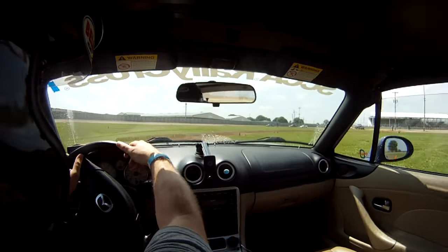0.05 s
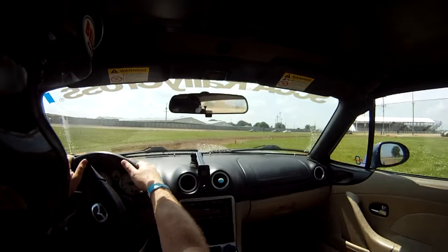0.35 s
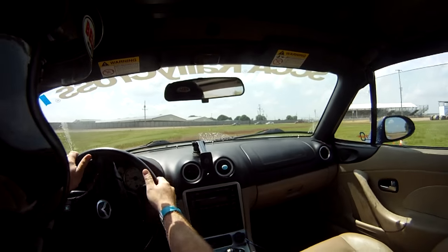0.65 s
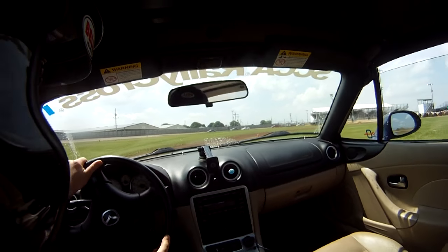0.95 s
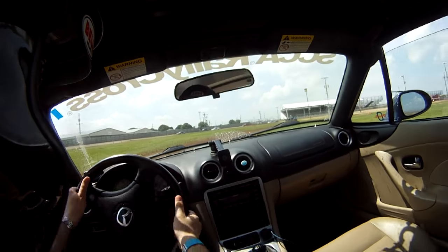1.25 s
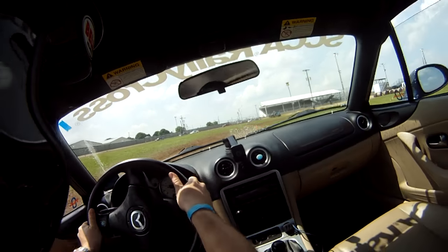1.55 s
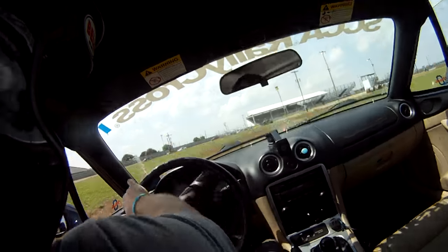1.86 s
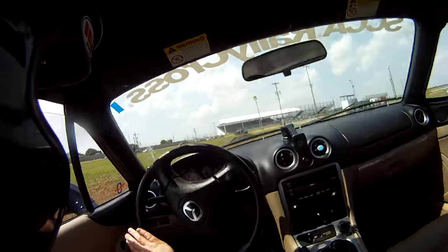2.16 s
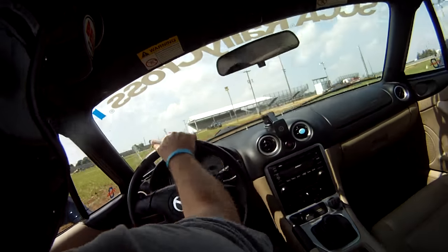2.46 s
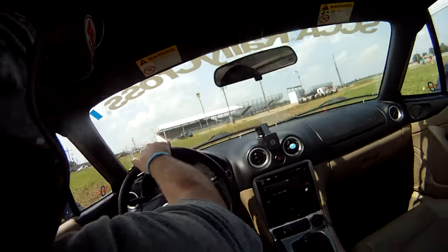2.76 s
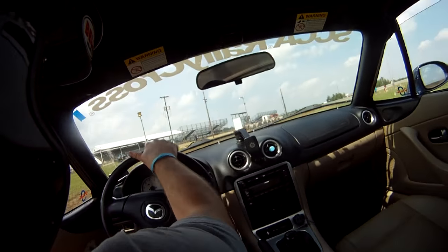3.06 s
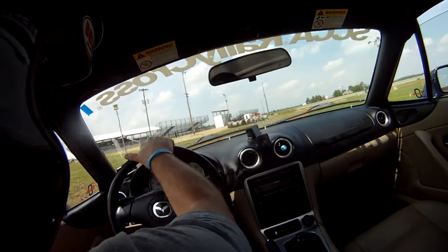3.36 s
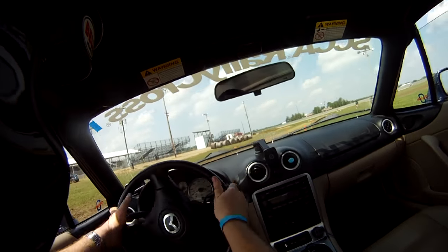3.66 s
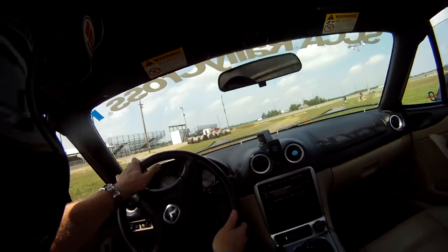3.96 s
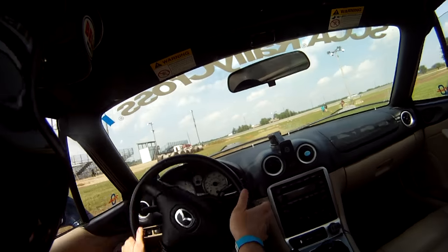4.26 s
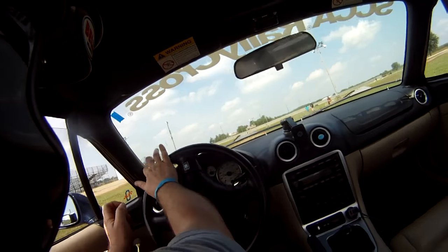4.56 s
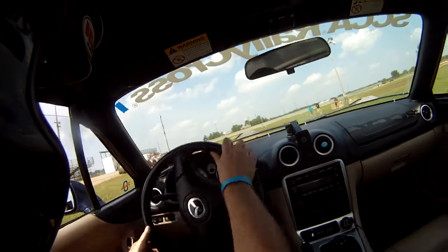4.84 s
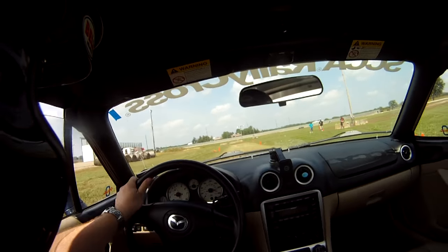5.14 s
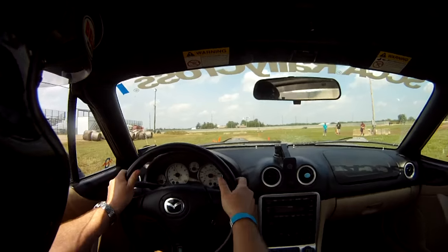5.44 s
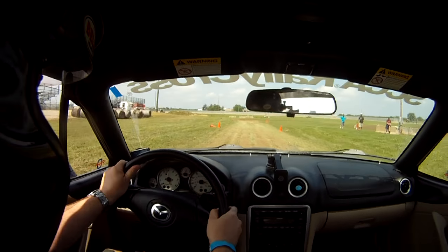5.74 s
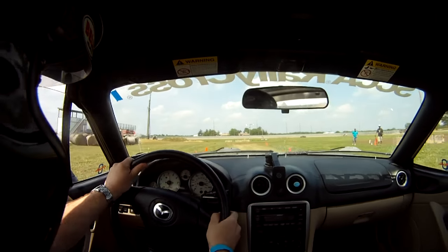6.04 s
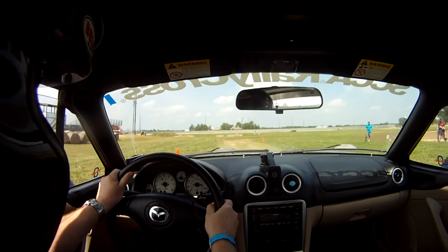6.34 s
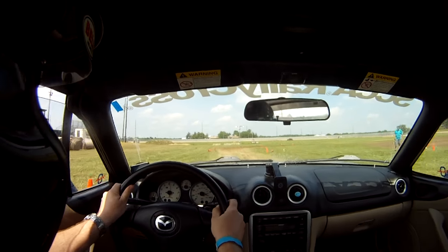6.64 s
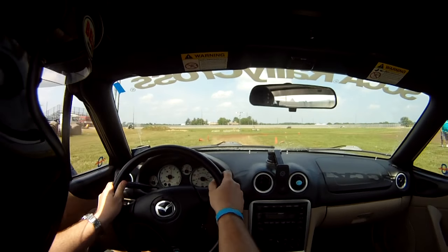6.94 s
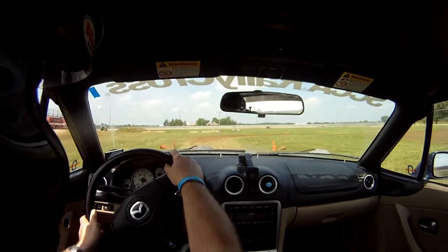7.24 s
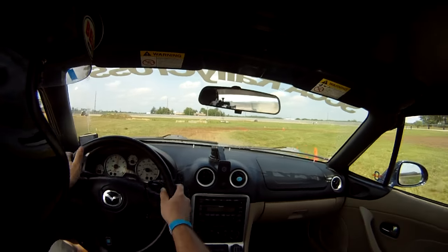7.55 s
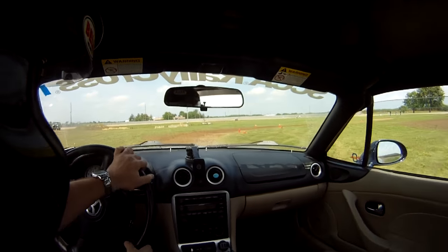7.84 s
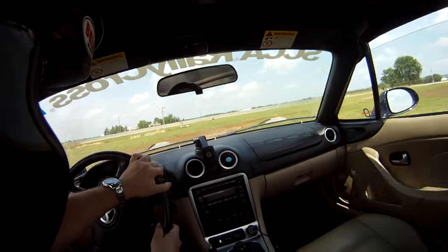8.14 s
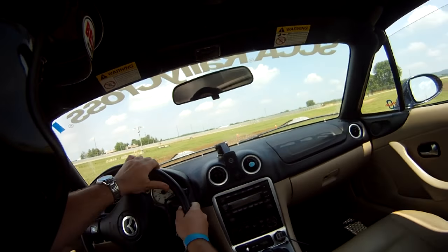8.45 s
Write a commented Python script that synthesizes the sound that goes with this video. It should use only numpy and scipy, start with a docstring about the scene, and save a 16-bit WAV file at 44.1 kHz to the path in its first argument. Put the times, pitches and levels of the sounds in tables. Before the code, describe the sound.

Inside a car bumping over dirt, with low rumble, a faint engine, gritty plastic rattling and several sharp clacks and heavy thumps.

```python
"""Rough ride in a small car

A car is driven hard over dirt and grass, heard from inside a closed plastic housing on a mount.
Bumpy ground shakes the cabin, the engine pulls faintly, and grit and loose trim rattle the housing.
In the ruts the mount clacks against its stop and the suspension bottoms out with heavy thumps."""
import sys
import numpy as np
from scipy import signal
from scipy.fft import rfft, irfft, next_fast_len
from scipy.io import wavfile

SR = 44100
rng = np.random.default_rng(int(sys.argv[2]) if len(sys.argv) > 2 else 0)


def to_wav(s):
    """Save 16-bit WAV."""
    ch = np.atleast_2d(s).T  # columns
    pcm = np.round(np.clip(ch, -1, 1) * 32767)  # PCM
    wavfile.write(sys.argv[1], SR, pcm.astype(np.int16))


N = 374850
TIME = np.arange(N) / SR

# the engine pulls, sags in a long turn and pulls again: (time [s], firing rate [Hz], level [dB])
ENGINE_CURVE = [(0, 114, -51.5), (.75, 129.2, -47.5), (1.5, 148, -56), (2.2, 135, -52), (3, 112, -64),
                (3.6, 124, -67.5), (5.5, 113, -48.5), (6, 118, -54.5), (6.45, 133, -45.5), (7, 141, -43.5),
                (7.5, 153, -51), (7.9, 159, -49.5), (8.5, 152, -68)]
# pitches at which the plastic housing rings: (pitch [Hz], width [Hz], level [dB])
HOUSING_RINGS = [(850, 970, -10), (1230, 38.4, 4), (1435, 93, 0.5), (1504, 523, -0.5), (2143, 115, 5),
                 (2434, 170, -1), (2860, 115, -1.5), (3490, 237, -7.5), (3897, 224, -8),
                 (4860, 1200, -20.5), (8100, 67, -39.5), (8440, 1700, -17.5), (9410, 85, -8.5),
                 (9800, 290, -12), (10990, 67, -20.5), (13800, 270, -12), (13900, 130, -32),
                 (14360, 210, -18.5)]
# tone colour of a crash and of a tick: (frequency [Hz], level [dB])
CRASH_COLOUR = [(150, 8.5), (350, 2.5), (520, -4.5), (850, 9), (1400, 5), (2200, 8), (3000, -6),
                (3800, -6.5), (6000, -25), (8300, -14.5), (10000, -5.5), (12000, -21), (14300, -9.5),
                (16000, -12.5)]
TICK_COLOUR = [(500, -5.5), (1800, -6), (3400, -2.5), (6000, -22), (8600, -10), (12000, -34), (15000, -11)]


def from_db(db):
    """Turn decibels into a volume factor."""
    return 10 ** (np.asarray(db) / 20)


def rms_one(x):
    """Scale a signal to an average power of 1."""
    return x / np.sqrt(np.mean(x ** 2) + 1e-20)


def in_time(rows):
    """Join timed rows with straight lines, giving one curve per value column."""
    times, *columns = np.transpose(rows)
    return [np.interp(TIME, times, column) for column in columns]


def drift(rate_hz, size=4096):
    """A smooth random wobble of about 1 either way, mostly slower than rate_hz."""
    hz = np.arange(size // 2 + 1) * SR / N
    spectrum = rfft(rng.standard_normal(size)) / (1 + (hz / rate_hz) ** 2)
    return np.interp(TIME, np.linspace(0, TIME[-1], size), rms_one(irfft(spectrum, size)))


def colour(x, points):
    """Filter a sound to follow points of (frequency [Hz], level [dB])."""
    size = 2 * next_fast_len(len(x))
    hz = np.maximum(np.arange(size // 2 + 1) * SR / size, 1)
    point_hz, db = np.transpose(points)
    gain = from_db(np.interp(np.log(hz), np.log(point_hz), db))
    # minimum phase: nothing rings before the hit that causes it
    cepstrum = irfft(np.log(gain))
    cepstrum[1:size // 2] *= 2
    cepstrum[size // 2 + 1:] = 0
    return irfft(rfft(x, size) * np.exp(rfft(cepstrum)))[:len(x)]


def resonate(x, rings):
    """Let a sound ring at several pitches, added with alternating signs."""
    out = 0
    for k, (hz, width, db) in enumerate(rings):
        r = np.exp(-np.pi * width / SR)
        poles = [1, -2 * r * np.cos(2 * np.pi * hz / SR), r * r]
        ring = (1 - r * r) / 2 * signal.lfilter([1, 0, -1], poles, x + 1e-18)
        out += (-1) ** k * from_db(db) * ring
    return out


def rising(seconds):
    """A soft start that climbs from 0 towards 1."""
    return 1 - np.exp(-TIME[:SR // 3] / seconds)


def dying(t60):
    """A fade that falls 60 dB in t60 seconds, cut to a third of a second."""
    return np.exp(-np.log(1000) * TIME[:SR // 3] / t60)


def tone(hz, t60):
    """One pure note, struck and left to fade."""
    return np.sin(2 * np.pi * hz * TIME[:SR // 3]) * dying(t60)


def burst(shape, points):
    """A puff of noise with the given loudness shape and tone colour."""
    return colour(shape * rng.standard_normal(len(shape)), points)


def add(track, time_s, sound, peak_db):
    """Lay a sound into the track at its time and peak level."""
    start = int(time_s * SR)
    part = sound[:N - start]
    track[start:start + len(part)] += from_db(peak_db) * part / np.abs(part).max()


def contacts(per_s, spread_db, size=N):
    """Tiny hits at random moments; spread_db makes their strength uneven."""
    strength = from_db(spread_db * np.minimum(rng.exponential(1, size), 4))
    return (rng.random(size) < per_s / SR) * strength * rng.choice([-1, 1], size)


def roughness(usual_db=-47):
    """How much rougher than usual the ground is, in dB."""
    # the ground under the tyres: (time [s], roughness [dB])
    ground = [(0.0, -50), (0.5, -49.5), (1.16, -45.5), (1.32, -42), (1.82, -38), (2.29, -40.5), (2.72, -38),
              (3.43, -46.5), (4.26, -46), (4.71, -47), (6.44, -50.5), (6.84, -48.5), (7.29, -48.5),
              (7.84, -43), (8.05, -44), (8.5, -45.5)]
    return in_time(ground)[0] - usual_db


def heave():
    """Each hump lifts the body on its springs: a swell of extra shake, in dB."""
    # humps in the ground: (time [s], half length [s], extra shake [dB])
    humps = [(1.233, 0.14, 12.5), (2.221, .1, 6), (3.16, .18, 5), (4.155, .17, 7.5), (6.961, .07, 5),
             (7.776, .1, 2.5), (8.5, 0.24, 5)]
    return sum(db * np.exp(-((TIME - time_s) / half_s) ** 2) for time_s, half_s, db in humps)


def spray_level(usual_db=-49.5, ease_s=0.04):
    """The level of flying dirt in dB: higher on rough ground, over humps and in slides."""
    # hard turns where sliding tyres throw dirt: (start [s], end [s], extra spray [dB])
    slides = [(1.578, 3.264, 2), (3.644, 4.66, 2.5), (7.552, 8.367, 4)]
    sliding_db = sum(db * np.clip(np.minimum(TIME - start, end - TIME) / ease_s, 0, 1)
                     for start, end, db in slides)
    return usual_db + 0.7 * roughness() + 0.25 * heave() + sliding_db


def whine(panel_hz=563, panel_width_hz=62, waver=0.00484, flutter_db=3.5):
    """Parts turning with the engine sing faintly as they pass the pitch at which a panel rings."""
    # whining parts: (multiple of the firing rate, level relative to the engine [dB])
    parts = [(3.75, -6.5), (4, -17), (4.5, -9.5)]
    firing_hz, level_db = in_time(ENGINE_CURVE)
    cycles = np.cumsum(firing_hz * (1 + waver * drift(6.25))) / SR
    out = 0
    for multiple, db in parts:
        response = 1 / (1 + (2 * (multiple * firing_hz - panel_hz) / panel_width_hz) ** 2)
        out += from_db(db) * response * np.sin(2 * np.pi * multiple * cycles)
    return from_db(level_db + flutter_db * drift(4.4)) * out


def engine(waver=0.0043):
    """The firing engine hums; each of its tones swells near a pitch at which the cabin rings."""
    # engine tones: (multiple of the firing rate, level [dB])
    engine_tones = [(1, 2), (2, -15), (2.5, -40), (3, -19.5), (4, -28), (5, -23)]
    # pitches at which the cabin rings: (pitch [Hz], width [Hz], boost [dB])
    cabin_rings = [(229.9, 9.6, 12.5), (673, 27, 11)]
    firing_hz, level_db = in_time(ENGINE_CURVE)
    cycles = np.cumsum(firing_hz * (1 + waver * drift(25))) / SR
    out = 0
    for multiple, db in engine_tones:
        lift_db = sum(boost / (1 + (2 * (multiple * firing_hz - hz) / width) ** 2)
                      for hz, width, boost in cabin_rings)
        out += from_db(db + lift_db) * np.sin(2 * np.pi * (multiple * cycles + rng.random()))
    return from_db(level_db) * out


def road(usual_shake_db=-37.5, usual_roar_db=-43.5):
    """Rough ground shakes the body on its springs, and the tyres roar through the floor."""
    # tone colour of the deep shake and of the tyre roar: (frequency [Hz], level [dB])
    shake_colour = [(10, -28.5), (22, -5.5), (34, 3.5), (44, -3.5), (60, -11), (80, -13.5), (160, -62)]
    roar_colour = [(55, -31.5), (78, -5.5), (102, 5.5), (130, -9), (190, -13.5), (240, -10.5), (330, -14),
                   (480, -22), (540, -18), (780, -27), (1500, -28.5), (5000, -84)]
    rough_db, heave_db = roughness(), heave()
    shake = rms_one(colour(rng.standard_normal(N), shake_colour))
    roar = rms_one(colour(rng.standard_normal(N), roar_colour))
    return (shake * from_db(usual_shake_db + 0.81 * rough_db + heave_db)
            + roar * from_db(usual_roar_db + 0.99 * rough_db + 0.23 * heave_db))


def grit(flicker_db=2.0, sand_db=-22):
    """Countless tiny hits, clumped by the bumps, ring the housing; sand grains tick on top."""
    bumps = from_db(1.1 * drift(28))
    spray = contacts(per_s=8000, spread_db=2.0) * bumps
    buzz = sum((-1) ** k * resonate(spray * from_db(flicker_db * drift(18)), [ring])
               for k, ring in enumerate(HOUSING_RINGS))
    sand = colour(contacts(per_s=130, spread_db=2.0) * bumps, TICK_COLOUR)
    return from_db(spray_level()) * (rms_one(buzz) + from_db(sand_db) * rms_one(sand))


def shudders(count=12, above_spray_db=13, spread_db=4.5, t60=0.066):
    """Pick extra rattles at random, likelier and stronger where more dirt flies."""
    spray_db = spray_level()
    odds = np.cumsum(from_db(spray_db) ** 2)
    times = np.interp(rng.random(count), odds / odds[-1], TIME)
    levels = np.interp(times, TIME, spray_db) + above_spray_db + spread_db * rng.standard_normal(count)
    return [(time_s, db, t60) for time_s, db in zip(times, levels)]


def rattles(boost_db=1.0, vary_db=0.5, rise_s=0.0034):
    """Jolts shake loose trim into flurries of hits, each ringing the housing a little differently."""
    # jolts to the trim: (time [s], level [dB], fade time [s])
    jolts = [(0.158, -34.5, 0.095), (0.19, -32, 0.12), (0.912, -36.5, 0.091), (1.266, -32, 0.13),
             (1.629, -29.5, 0.52), (1.888, -21.5, 0.053), (2.847, -20, 0.032), (4.725, -27.5, 0.066),
             (6.797, -33.5, 0.54), (7.05, -31, 0.038), (7.614, -29.5, 0.064), (7.759, -31.5, 0.1),
             (7.862, -29, 0.038), (8.172, -32, 0.51), (8.4, -32, .09)]
    out = np.zeros(N)
    for time_s, db, t60 in jolts + shudders():
        shape = dying(t60) * rising(rise_s)
        rings = [(hz, width, ring_db + vary_db * rng.standard_normal())
                 for hz, width, ring_db in HOUSING_RINGS]
        flurry = shape * contacts(per_s=2100, spread_db=0.0, size=len(shape))
        add(out, time_s, resonate(flurry, rings), db + boost_db)
    return out


def ticks(t60=0.0092):
    """Small stones and other hard hits make bright ticks that die within milliseconds."""
    # hard hits: (time [s], peak [dB])
    hits = [(1.971, -18), (1.9997, -15.5), (2.392, -15.5), (2.4481, -14.5), (2.821, -20), (2.8337, -17.5),
            (5.635, -7.5), (5.6399, -0.5), (5.667, -20), (5.6909, -14), (5.701, -16.5)]
    out = np.zeros(N)
    for time_s, db in hits:
        add(out, time_s, burst(dying(t60), TICK_COLOUR), db)
    return out


def clacks(vary_db=0.5, rise_s=0.00064, crack_t60=0.029, crack_db=-13):
    """The mount hits its stop with a sharp crack and rings briefly."""
    # notes of the struck mount: (pitch [Hz], level [dB], fade time [s])
    mount_notes = [(712, -14.5, 0.028), (935, -5, 0.013), (1210, -3.5, 0.019), (1637, -5, 0.015),
                   (2125, -6, 0.0077), (2770, -4, 0.0028), (3760, -10.5, 0.011), (8270, -13.5, 0.0084),
                   (10650, -13, 0.011), (13900, -10, 0.008)]
    # knocks against the stop: (time [s], peak of the ring [dB], brightness [dB per octave])
    knocks = [(1.7406, 2.5, 0), (1.896, -21, -5), (2.122, -17, 0), (2.1510, -4.5, -3.5), (2.1616, 0.5, 1),
              (2.3186, -5.5, -7.5), (2.649, -18.5, -1.5)]
    out, onset = np.zeros(N), rising(rise_s)
    for time_s, db, brightness in knocks:
        ring = 0
        for k, (hz, note_db, t60) in enumerate(mount_notes):
            strength = from_db(note_db + brightness * np.log2(hz) - vary_db * rng.standard_normal())
            ring += (-1) ** k * strength * tone(hz, t60)
        add(out, time_s, onset * ring, db)
        add(out, time_s, burst(onset * dying(crack_t60), CRASH_COLOUR), db + crack_db)
    return out


def thumps(body_t60=0.21, rise_s=0.0016, panel_ratio=1.39, panel_t60=0.15, panel_db=-7):
    """The suspension bottoms out: loose things crash, the body booms and its panels ring higher."""
    # blows: (time [s], crash peak [dB], crash fade time [s], thump peak [dB], thump pitch [Hz])
    blows = [(2.135, -24.5, 0.076, -15, 37.5), (2.3619, -8, 0.039, -13, 55.6), (2.373, -9, 0.11, -12, 34.2),
             (2.4186, -18.5, 0.12, -14, 34), (2.578, -13, 0.11, -29.5, 66), (2.788, -18, 0.093, -30.5, 60),
             (5.6301, -3, 0.067, -6.5, 83), (5.67, -27.5, 0.43, -12, 47.7), (6.2892, -10, 0.039, -16, 84.6),
             (6.313, -25, 0.14, -9, 45)]
    out = np.zeros(N)
    for time_s, crash_db, crash_t60, thump_db, hz in blows:
        add(out, time_s, burst(dying(crash_t60), CRASH_COLOUR), crash_db)
        boom = tone(hz, body_t60) + from_db(panel_db) * tone(panel_ratio * hz, panel_t60)
        add(out, time_s, rising(rise_s) * boom, thump_db)
    return out


def scene():
    """Everything reaches one microphone inside the housing."""
    return (engine() + whine() + road() + grit() + rattles() + ticks() + clacks() + thumps())[None]


def record(dry, ceiling=0.92, cutoff_hz=15300):
    """The hardest knocks overload, and the highest treble is cut away."""
    treble_cut = signal.ellip(10, .1, 70, cutoff_hz, fs=SR, output="sos")
    return signal.sosfilt(treble_cut, np.clip(dry, -ceiling, ceiling))


dry = scene()
out = record(dry)
to_wav(out)
```